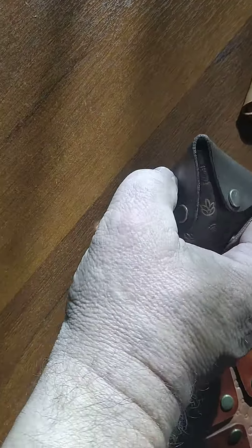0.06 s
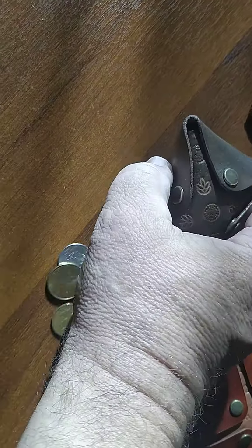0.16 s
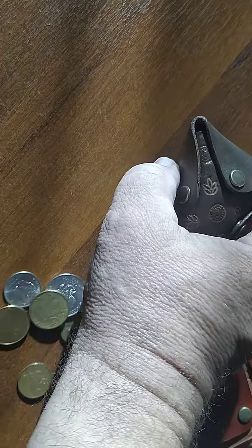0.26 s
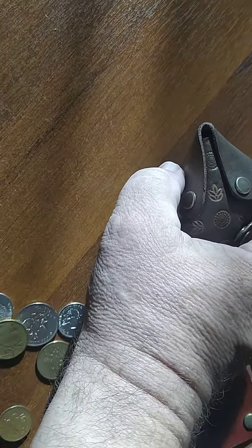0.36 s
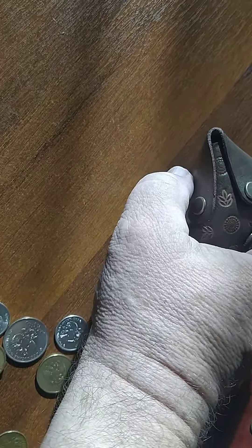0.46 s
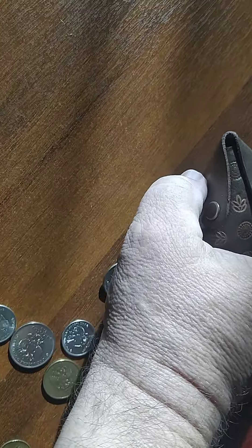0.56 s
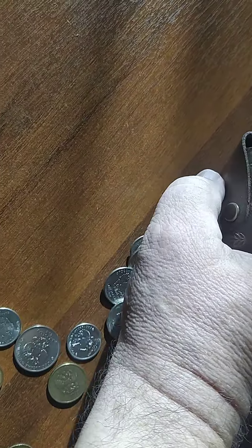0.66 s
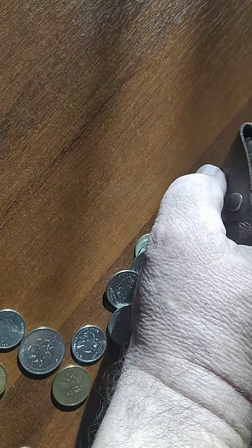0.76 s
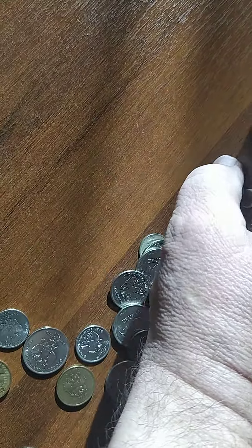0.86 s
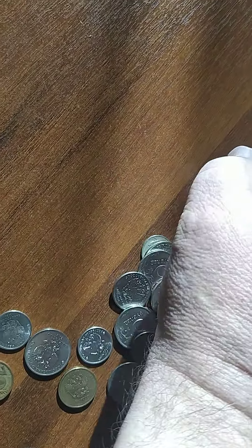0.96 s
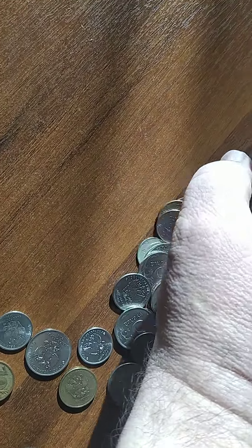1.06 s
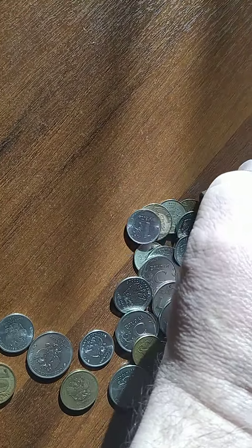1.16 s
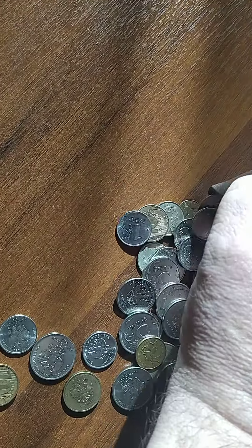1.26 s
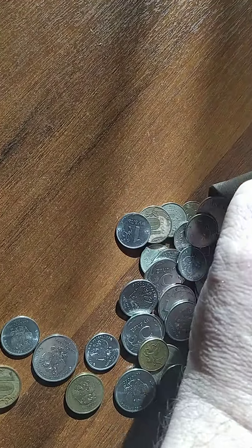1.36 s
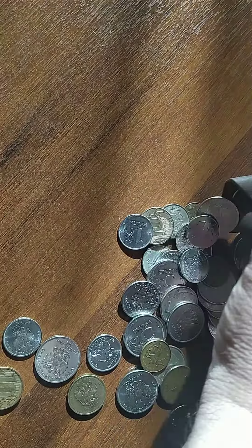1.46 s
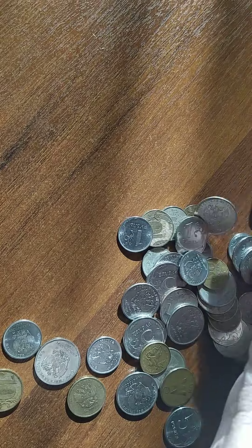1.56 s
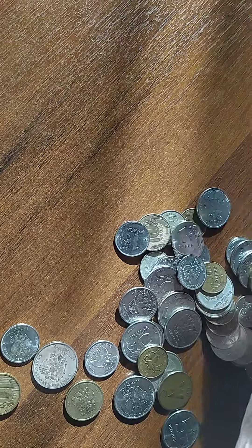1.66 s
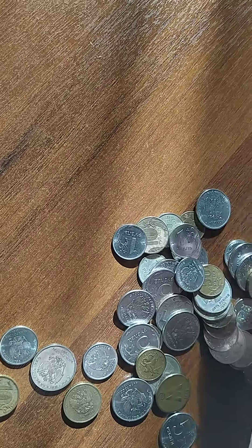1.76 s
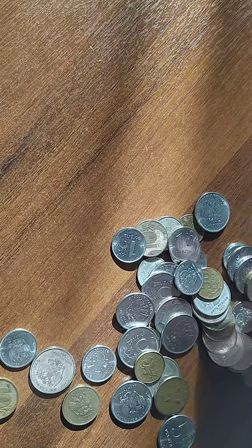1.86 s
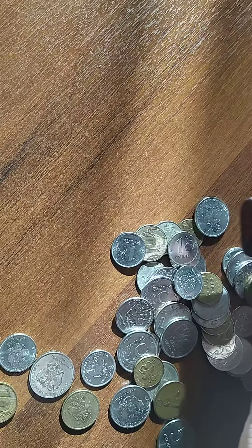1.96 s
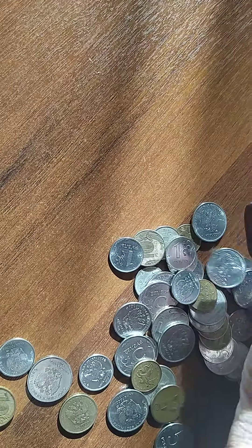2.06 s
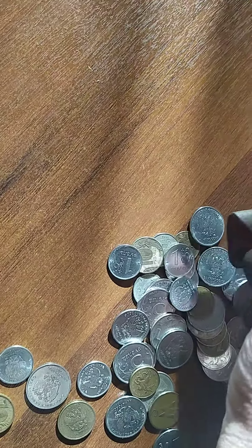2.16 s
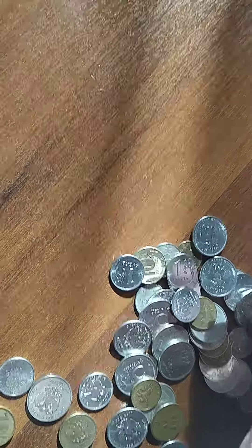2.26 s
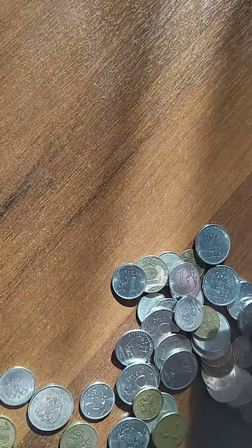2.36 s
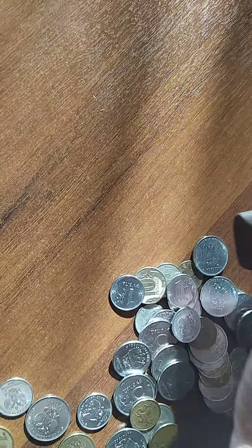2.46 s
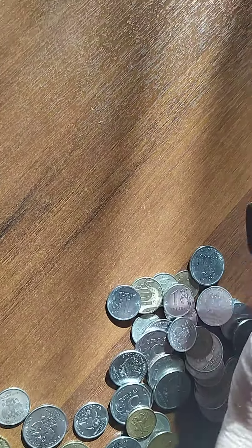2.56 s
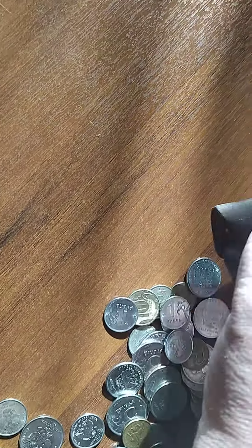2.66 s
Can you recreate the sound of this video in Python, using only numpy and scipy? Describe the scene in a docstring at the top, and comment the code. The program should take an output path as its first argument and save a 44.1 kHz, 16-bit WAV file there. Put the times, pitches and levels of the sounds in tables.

```python
"""Coins slide out of a leather purse onto a wooden table, close to the microphone, in a small room.
Each clear hit is a short metal clink with a faint modal ring and a knock that excites the table top.
Between the hits a mass of small contacts tumbles and slides, built from scattered bursts and grains.
The moving hand wafts air over the microphone (slow pressure dips), the purse thuds (dull noise bursts),
and its leather creaks (falling tones) and scrapes (a resonance fed with noise)."""
import sys
import numpy as np
from scipy import signal
from scipy.fft import rfft, irfft
from scipy.io import wavfile

SR = 44100
rng = np.random.default_rng(int(sys.argv[2]) if len(sys.argv) > 2 else 0)


def master(y):
    """Save y as 16-bit WAV."""
    cut = np.clip(np.atleast_2d(y).T, -1, 1)
    pcm = np.round(cut * 32767)  # scale
    wavfile.write(sys.argv[1], SR, pcm.astype(np.int16))


N = 119070

# Clear coin hits. Each row: start in seconds, clink level in dB before its trim, centre of the clink in Hz,
# level of the knock on the wood in dB before its trim, centre of the knock in Hz, left minus right in dB.
HITS = [(0.03, -41, 9800, -49, 1290, -17), (0.146, -13.5, 9970, -17.5, 2460, -6),
        (0.1611, -13.5, 9700, -14, 2376, 2), (0.2084, -14.5, 9800, -25, 2570, -3),
        (0.2164, -6, 8900, -19.5, 1300, 5), (0.2364, -9.5, 8980, -48, 1540, -13),
        (0.24, -14, 9400, -38, 1590, -5), (0.2564, -15, 8900, -38, 2000, -2),
        (0.2627, -10, 8860, -20.5, 2630, 8), (0.2756, -19, 9200, -41, 2500, -4),
        (0.2878, -14, 8660, -27, 1820, 7), (0.2984, -22, 9000, -19, 1640, -8),
        (0.3379, -8.5, 9270, -19, 2500, 3), (0.3579, -5.5, 7700, -17, 2790, -2),
        (0.379, -13, 8830, -23, 2120, -2), (0.3855, -7.5, 8630, -19, 2860, -7),
        (0.3906, -11, 9480, -28, 2300, 7), (0.3975, -19, 9050, -18.5, 2390, 8),
        (0.4024, -10.5, 8850, -21, 1945, 6), (0.408, -21, 9600, -23, 1894, -3),
        (0.4566, -8, 8950, -17.5, 2475, -6), (0.4757, -21, 8450, -40, 1630, -1),
        (0.529, -21, 9700, -37.5, 1090, -13), (0.5777, -19.5, 9800, -27.5, 2470, -12),
        (0.6025, -20, 9500, -23.5, 3240, -3), (0.6697, -21, 9650, -33, 2200, -3),
        (0.7217, -20.5, 9200, -35, 2360, -9), (0.7333, -10, 9940, -24.5, 2553, -4),
        (0.7586, -20, 8800, -31, 2200, -10), (0.7806, -9, 9410, -20, 2590, -2),
        (0.8014, -22, 8560, -29.5, 1940, -5), (0.8506, -18.5, 7260, -30.5, 1735, -2),
        (1.003, -24, 9800, -44.5, 2400, -4), (1.0074, -14, 10000, -29, 2390, -9),
        (1.0127, -13, 10000, -27.5, 2430, 1), (1.0559, -21, 9880, -25, 2190, -12),
        (1.059, -9, 9750, -28, 2160, -1), (1.0808, -25, 9400, -36.5, 2000, -10),
        (1.1121, -19, 9400, -31.5, 1070, -12), (1.1302, -11.5, 10100, -29.5, 1140, -2),
        (1.1667, -12, 9640, -23.5, 1075, -3), (1.1901, -10.5, 10200, -26, 1340, -6),
        (1.2323, -13.5, 9800, -28, 1610, -1), (1.2446, -13, 10170, -29.5, 2060, 1.5),
        (1.343, -20, 9200, -34.5, 2420, 5), (1.3467, -12, 9300, -28.5, 1540, -2),
        (1.357, -18, 9000, -34, 1970, -2), (1.5159, -18, 8630, -32, 2290, -8),
        (1.535, -17, 8980, -31, 2190, -6), (1.5571, -29, 8500, -27.5, 1640, 2),
        (1.5779, -29, 8970, -36, 1210, -1), (1.6457, -25, 9000, -35.5, 1160, 0.5),
        (1.674, -5.5, 7600, -16, 1890, 0.5), (1.6763, -12.5, 9000, -20.5, 1044, 14.5),
        (1.7124, -16, 9400, -21.5, 2480, -3), (1.717, -22.5, 9340, -34.5, 2450, -3),
        (1.74, -10.5, 9520, -23.5, 1045, 0), (1.7482, -13, 9840, -43.5, 1040, 0.5),
        (1.8033, -18.5, 8200, -31.5, 1530, -9.5), (1.8295, -23.5, 9200, -36, 1160, -12),
        (1.8457, -23.5, 8200, -34.5, 1455, 3), (1.882, -27.5, 8700, -36, 1132, -8),
        (1.9607, -48.5, 8700, -47, 1020, -11), (2.051, -8.5, 10250, -17, 1544, -2),
        (2.0829, -13, 9450, -22, 1400, 0), (2.096, -6.5, 8700, -26.5, 1450, -12),
        (2.1027, -12, 8700, -42, 1730, -4), (2.1143, -8.5, 8700, -28.5, 1560, 4),
        (2.1954, -16.5, 8330, -42, 1560, -7), (2.2259, -23.5, 8540, -39, 1560, -3.5),
        (2.2455, -24.5, 8400, -60, 1490, -2.5), (2.271, -44, 7800, -49, 1330, -7.5),
        (2.3082, -37, 8200, -44.5, 1340, -2), (2.3512, -36.5, 8400, -52, 1500, -5.5),
        (2.4139, -18, 8250, -28.5, 2350, -7), (2.4406, -19, 6460, -30.5, 2270, -5),
        (2.4588, -29, 8740, -36, 1640, -15), (2.4714, -27.5, 8270, -44, 1750, 3.5)]

TOP_HZ = 16300  # upper limit of the partials and of the recorder
RISE_S = 0.001  # swell of a contact
CLINK_S, CLINK_WIDTH_OCT, CLINK_TRIM_DB = 0.0012, 0.32, -1
PING_DB, PING_T60_S, PING_SPREAD_OCT = 0, 0.042, 0.3
RING_TRIM_DB, RING_T60_S, RING_SPREAD = -15, 0.07, 0.0056  # spread: relative detuning within a mode pair
TUMBLE_PER_S, TUMBLE_SCATTER_DB, TUMBLE_S, TUMBLE_TRIM_DB = 400, 4.2, 0.0031, -5
TUMBLE_HZ, TUMBLE_SPREAD_OCT = 9720, 0.68
TUMBLE_PAN_DB, PAN_SCATTER_DB = -3.5, 5.5  # left minus right
KNOCK_S, KNOCK_WIDTH_OCT, KNOCK_TRIM_DB = 0.0091, 1, -5.5
KNOCK_BODY = 0.77  # broadband share of a knock
CLACK_DB, CLACK_T60_S, CLACK_SPREAD_OCT = -8, 0.028, 1.1  # level relative to the knock
SLIDE_PER_S, SLIDE_SCATTER_DB, SLIDE_TRIM_DB = 1500, 2, -3.5
TABLE_DB, TABLE_T60_S, TABLE_DAMP_HZ = -10.5, 0.34, 1200  # T60 at the lowest pitches, shorter higher up
BASS_PAN_DB, WOOD_PAN_DB = 5.5, -3.5  # left minus right, for the lows and for the rest
WOOD_WIDE_HZ, WOOD_WIDTH = 865, 1  # where the sides begin to differ; side-to-mid ratio well above
ROOM_T60_S, ROOM_TREBLE_T60_S, ROOM_DELAY_S = 0.22, 0.12, 0.0024
ROOM_METAL_DB, ROOM_WOOD_DB = -4.5, -7
ROOM_CUT_HZ = 13800  # the walls absorb the top of the treble
PUFF_CUT_HZ, PUFF_SKEW = 5, 0.59  # a skew under one puts the dip early
THUD_RISE_S, THUD_S = 0.0031, 0.0072
CREAK_HZ, CREAK_S, CREAK_SAG_HZ_PER_S = 1383, 0.005, 80000
DRAG_HZ, DRAG_T60_S = 402, 0.13


def undb(db):
    """Amplitude gain from a level in decibels."""
    return 10 ** (np.asarray(db) / 20)


def unit(x):
    """Normalization to an energy of one per channel."""
    return x / np.sqrt(np.sum(x ** 2) / len(np.atleast_2d(x)))


def clock(seconds):
    """Sample times from zero."""
    return np.arange(int(seconds * SR)) / SR


def pan(db):
    """Intensity stereo: left and right gains of constant power."""
    g = undb(np.array([[db], [-db]]) / 2)
    return g / np.sqrt(np.mean(g ** 2))


def add(out, s, x):
    """Superposition: mix a sound in at a time."""
    i = max(int(s * SR), 0)
    n = max(min(x.shape[-1], N - i), 0)
    out[..., i:i + n] += x[..., :n]


def through(x, response):
    """Linear filtering: convolve a stereo sound with an impulse response."""
    return signal.fftconvolve(x, np.atleast_2d(response), axes=-1)[:, :N]


def colour(points, size=2048):
    """Minimum phase: causal unit-energy response with a spectrum of (Hz, dB) points, by the cepstrum."""
    hz, db = np.array(points).T
    f = np.fft.rfftfreq(size, 1 / SR) + 1
    cepstrum = irfft(np.log(undb(np.interp(np.log(f), np.log(hz), db))))
    cepstrum[1:size // 2] *= 2  # fold the negative times onto the positive ones
    cepstrum[size // 2 + 1:] = 0
    return unit(irfft(np.exp(rfft(cepstrum))))


def fade(t, t60):
    """Exponential damping: a decay of 60 dB in t60 seconds."""
    return np.exp(-np.log(1000) * t / t60)


def focus(hz, width_oct, size):
    """Resonance: the gain falls with the distance in octaves from the centre."""
    octaves = np.log2((np.fft.rfftfreq(size, 1 / SR) + 1) / hz)
    return 1 / np.sqrt(1 + (octaves / width_oct) ** 2)


def contact(noise, spectrum, decay_s):
    """Rough contact: a burst of micro-impacts that swells and dies away."""
    t = np.arange(noise.shape[-1]) / SR
    coloured = irfft(rfft(noise) * spectrum)
    burst = coloured * (1 - np.exp(-(t / RISE_S) ** 2)) * np.exp(-t / decay_s)
    return unit(burst) * np.sqrt(decay_s * SR / 2)


def ring(hz, t60, spread_oct, spectrum, count):
    """Modal ringing: damped partials drawn around a pitch, weighted by a spectrum of (Hz, dB) points."""
    t, (f, db) = clock(t60), np.array(spectrum).T
    partials = np.minimum(hz * 2 ** (spread_oct * rng.uniform(-0.965, 1, (count, 1))), TOP_HZ)
    waves = undb(np.interp(partials, f, db)) * np.sin(2 * np.pi * partials * t)
    return unit(rng.standard_normal((2, count)) @ waves * fade(t, t60))


def flow(t, axis):
    """Granular flow: gain of the small contacts at times t, axis 1 for coin on coin, 2 for coin on wood."""
    # The pour of the coins. Each row: time in seconds, level of coin on coin in dB before its trim,
    # level of coins sliding on wood in dB before its trim.
    pour = [(0, -28.5, -42.5), (.09, -33, -40.5), (.135, -19.5, -34.5), (.155, -22, -29), (.3, -15, -21.5),
            (.405, -19, -25.5), (.43, -18, -28.5), (.52, -18.5, -23), (.575, -30.5, -35), (.70, -30, -34),
            (.745, -22, -27), (.80, -26, -35), (.83, -38, -36.5), (.99, -34.5, -35.5), (1.07, -39, -38),
            (1.12, -25, -30.5), (1.18, -26.5, -32.5), (1.33, -22.5, -29), (1.40, -28, -36.5),
            (1.455, -30, -28), (1.49, -46.5, -51), (1.55, -46.5, -39.5), (1.60, -37, -48),
            (1.655, -27, -37), (1.72, -53, -42), (1.765, -22.5, -28.5), (1.84, -43, -39),
            (1.93, -47, -49.5), (1.955, -85, -82.5), (2.04, -64, -54.5)]
    # The two last shakes of the purse, one list for each, with the same columns.
    shakes = [
        [(2.053, -32, -29), (2.068, -15.5, -29), (2.10, -17.5, -26), (2.13, -19.5, -28), (2.17, -29.5, -35),
         (2.25, -50, -41), (2.29, -81, -77), (2.41, -65, -48.5)],
        [(2.416, -11.5, -25), (2.432, -50, -35.5), (2.465, -25.5, -34), (2.485, -55, -40.5)],
    ]
    gain = 0
    for curve in map(np.array, [pour] + shakes):
        gain = gain + undb(np.interp(t, curve[:, 0], curve[:, axis], left=-np.inf, right=-np.inf))
    return gain


def small_contacts(per_s, scatter_db, count):
    """Random excitation: uneven times and sizes (mean power one) of a stream of contacts."""
    chance = rng.standard_normal((count, 2))
    times = (np.arange(count) + 2 * chance[:, 0]) / per_s
    size = undb(scatter_db * np.clip(chance[:, 1], -2, 2))
    return times, size / np.sqrt(np.mean(size ** 2))


def metal(size=512):
    """Impact of stiff discs: bright clinks, each with a brief ping and a faint ring of the pile's modes."""
    # Ringing modes of the different coins. Each row: frequency in Hz, level in dB before the ring trim.
    coins = [(5615, -9), (6191, 5), (6686, 2.5), (7063, 7), (7498, -8), (8214, 13), (8816, 16), (8959, 6),
             (9142, 6.5), (9453, 6.5), (9800, 15.5), (10153, 2.5), (10690, 6), (13239, -8)]
    # Spectrum of a clink. Each row: frequency in Hz, relative level in dB.
    clink = [(2000, -13.5), (4000, -7.5), (6200, -4), (8700, -1.5), (10500, 2.5), (11300, -13.5),
             (12000, -13.5), (12900, -7.5), (13700, -15.5), (14900, -10.5), (16300, -46.5)]
    shape, t = np.abs(rfft(colour(clink)[:size])), clock(.3)
    f = np.fft.rfftfreq(size, 1 / SR)

    contacts = [(s, undb(db + CLINK_TRIM_DB), hz, pan_db, CLINK_S) for s, db, hz, _, _, pan_db in HITS]
    times, sizes = small_contacts(TUMBLE_PER_S, TUMBLE_SCATTER_DB, count=2000)
    gains = sizes * flow(times, axis=1) * undb(TUMBLE_TRIM_DB)
    for s, gain, (pitch, side) in zip(times, gains, rng.standard_normal((len(times), 2))):
        hz = TUMBLE_HZ * 2 ** (TUMBLE_SPREAD_OCT * np.tanh(pitch))
        contacts.append((s, gain, hz, TUMBLE_PAN_DB + PAN_SCATTER_DB * side, TUMBLE_S))

    out, strikes = np.zeros((2, N)), np.zeros((len(coins), 2, N))
    for s, gain, hz, pan_db, decay_s in contacts:
        noise = rng.standard_normal((2, size))
        mix = rng.uniform(-1.4, 1, (len(coins), 2, 1))  # how far each mode is struck, on each side
        ping = ring(hz, PING_T60_S, PING_SPREAD_OCT, clink, count=3)
        ping = ping * np.sqrt(decay_s * SR / 2) * undb(PING_DB)
        if gain > 0:
            sides = gain * pan(pan_db)
            add(out, s + RISE_S, sides * ping * np.interp(hz, f, shape / shape.max()))
            add(out, s, sides * contact(noise, focus(hz, CLINK_WIDTH_OCT, size=size) * shape, decay_s))
            add(strikes, s + RISE_S, sides * mix * np.sqrt(decay_s * SR / len(coins)))

    for struck, (hz, db) in zip(strikes, coins):
        pair = hz * np.array([[1], [1 + RING_SPREAD]])  # a stamped disc has its modes in close pairs
        mode = unit(np.sin(2 * np.pi * pair * t).sum(axis=0) * fade(t, RING_T60_S))
        out = out + through(struck, mode) * undb(RING_TRIM_DB + db)
    return out


def wood(size=1024):
    """Forced plate vibration: knocks with short clacks and a grainy slide all ring the table's modes."""
    # Modes of the table top. Each row: frequency in Hz, relative level in dB.
    table_modes = [(270, 3.5), (406, 5.5), (468, -5.5), (576, -6.5), (818, -5.5), (1044, 1.5), (1254, -6),
                   (1550, -1.5), (1801, 2.5), (2017, 4), (2268, -5), (2570, -3), (2785, -6.5)]
    # Spectrum of a knock. Each row: frequency in Hz, relative level in dB.
    knock = [(60, -41), (170, -6.5), (270, -8), (460, 5.5), (700, -4), (1100, 1.5), (1800, 0), (2700, 1.5),
             (3400, -3), (4400, 0), (7000, -12.5), (15000, -36.5)]
    push = np.zeros((2, N))
    for s, _, _, db, hz, _ in HITS:
        spectrum = KNOCK_BODY + focus(hz, KNOCK_WIDTH_OCT, size=size) ** 2
        gain = undb(db + KNOCK_TRIM_DB)
        add(push, s, contact(rng.standard_normal((2, size)), spectrum, KNOCK_S) * gain)
        clack = ring(hz, CLACK_T60_S, CLACK_SPREAD_OCT, knock, count=9)
        add(push, s + RISE_S, clack * np.sqrt(KNOCK_S * SR / 2) * gain * undb(CLACK_DB))

    times, sizes = small_contacts(SLIDE_PER_S, SLIDE_SCATTER_DB, count=7000)
    gains = sizes * flow(times, axis=2) * undb(SLIDE_TRIM_DB)
    grains = rng.standard_normal((len(times), 2, size // 64))
    for s, gain, grain in zip(times, gains, grains):
        if gain > 0:
            add(push, s, grain * gain * np.sqrt(SR / SLIDE_PER_S / grain.shape[-1]))

    t, modes = clock(.4), 0
    for hz, db in table_modes:
        t60 = TABLE_T60_S / np.sqrt(1 + hz / TABLE_DAMP_HZ)
        modes = modes + undb(db) * unit(np.sin(2 * np.pi * hz * t) * fade(t, t60))
    return through(push, colour(knock)) + undb(TABLE_DB) * through(push, unit(modes))


def rumble():
    """Stationary noise: a faint background, strongest in the lowest bass."""
    # Spectrum of the background. Each row: frequency in Hz, relative level in dB.
    floor_spectrum = [(20, 6), (30, -12), (69, -12.5), (120, -1.5), (190, -8), (328, -18), (1240, -23.5),
                      (5300, -41.5), (11000, -25), (15000, -64)]
    floor_db = -62.5
    return through(rng.standard_normal((2, N)), colour(floor_spectrum)) * undb(floor_db)


def spread(x):
    """Coherence: the table radiates its lows as one body, left of centre; higher up the sides differ."""
    f = np.fft.rfftfreq(N, 1 / SR)
    high = f ** 2 / (f ** 2 + WOOD_WIDE_HZ ** 2)
    mid, side = rfft(x)  # the two independent channels serve as middle and side
    width = WOOD_WIDTH * np.sqrt(high)
    lean_db = BASS_PAN_DB * (1 - high) + WOOD_PAN_DB * high
    stereo = np.array([mid + width * side, mid - width * side]) / np.sqrt(1 + width ** 2)
    return irfft(stereo * undb(np.array([lean_db, -lean_db]) / 2), N)


def room(x, t60, db):
    """Reverberation: the direct sound plus the dense, decaying reflections of a small room."""
    t = clock(0.58)
    tail = unit(rng.standard_normal((2, len(t))) * fade(t, t60) * (t > ROOM_DELAY_S))
    tail = signal.sosfilt(signal.butter(4, ROOM_CUT_HZ, fs=SR, output="sos"), tail)
    return x + undb(db) * through(x, tail)


def air():
    """Pressure of moving air: quick dips at the microphone, which swings back slowly."""
    # Puffs of air. Each row: start in seconds, level in dB before the high-pass, length in seconds,
    # left minus right in dB.
    puffs = [(0.214, -16.5, 0.075, 6), (0.368, -25, 0.038, -8), (0.728, -38, 0.047, -5),
             (1.19, -21, 0.067, -10), (1.343, -40, 0.049, -8), (1.68, -19.5, 0.031, 6),
             (1.732, -22.5, 0.092, 8), (2.045, -32, 0.12, 3.5)]
    out = np.zeros((2, N))
    for s, db, length, pan_db in puffs:
        dip = np.sin(np.pi * (clock(length) / length) ** PUFF_SKEW) ** 2
        add(out, s, -undb(db) * dip * pan(pan_db))
    return signal.sosfilt(signal.butter(2, PUFF_CUT_HZ, "high", fs=SR, output="sos"), out)


def thuds(size=4096):
    """Soft impact: the yielding weight of hand and purse excites only the lows, a short, dull thump."""
    # Thuds of the hand and the full purse. Each row: start in seconds, level in dB, left minus right in dB.
    landings = [(0.223, -22.5, 11), (0.372, -28.5, 0), (0.461, -45, 0), (1.198, -30, -11),
                (1.685, -28, 16.5), (1.75, -36.5, 6), (2.061, -44, -1.5)]
    # Spectrum of a thud. Each row: frequency in Hz, relative level in dB.
    thud_spectrum = [(25, -4), (60, 1.5), (150, -1.5), (210, -8), (400, -27.5), (2000, -67.5)]
    out, t, dull = np.zeros((2, N)), np.arange(size) / SR, rfft(colour(thud_spectrum), size)
    envelope = (1 - np.exp(-(t / THUD_RISE_S) ** 2)) * np.exp(-t / THUD_S)
    for s, db, pan_db in landings:
        thump = irfft(rfft(rng.standard_normal(size)) * dull) * envelope
        add(out, s, unit(thump) * np.sqrt(THUD_S * SR / 2) * undb(db) * pan(pan_db))
    return out


def leather():
    """Stick-slip friction: short falling creaks, and a rough, low scrape where the purse drags."""
    # Creaks of the leather. Each row: start in seconds, level in dB.
    creaks = [(1.2715, -25), (1.2949, -15.5), (1.3101, -19)]
    # Drags of the purse on the table. Each row: start in seconds, length in seconds, level in dB.
    drags = [(0.937, 0.085, -36), (1.32, 0.093, -39)]
    out, t = np.zeros((2, N)), clock(CREAK_S)
    tone = np.sin(2 * np.pi * (CREAK_HZ - CREAK_SAG_HZ_PER_S * t / 2) * t)
    for s, db in creaks:
        add(out, s, undb(db) * np.sin(np.pi * t / CREAK_S) * tone)

    t = clock(DRAG_T60_S)
    resonance = unit(np.sin(2 * np.pi * DRAG_HZ * t) * fade(t, DRAG_T60_S))
    scrape = through(rng.standard_normal((2, N)), resonance)[0]
    for s, length, db in drags:
        t = clock(length)
        piece = unit(scrape[int(s * SR):][:len(t)]) * np.sqrt(len(t) / 2)
        add(out, s, undb(db) * np.sin(np.pi * t / length) * piece)
    return out


def scene():
    """Superposition: coins, table and purse in the room, moving air, and a faint low rumble."""
    background = rumble()
    table = spread(room(wood(), ROOM_T60_S, ROOM_WOOD_DB) + background)
    coins = room(metal(), ROOM_TREBLE_T60_S, ROOM_METAL_DB)
    purse = room(leather() + thuds(), ROOM_T60_S, ROOM_WOOD_DB)
    return coins + table + purse + air()


def record(dry):
    """Clipping and band limiting: the recorder cuts off the highest peaks, then the top of the treble."""
    return signal.sosfilt(signal.ellip(8, .2, 80, TOP_HZ, fs=SR, output="sos"), np.clip(dry, -1, 1))


dry = scene()
out = record(dry)
master(out)
```